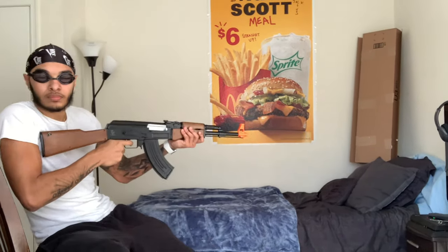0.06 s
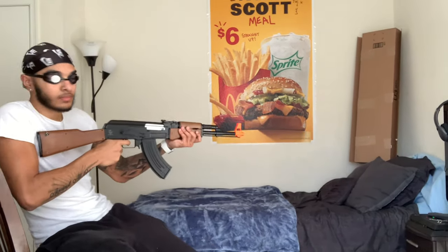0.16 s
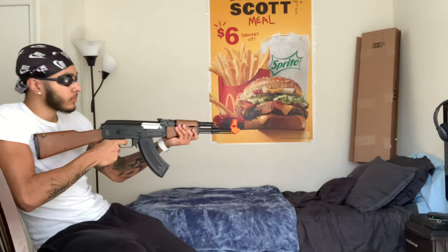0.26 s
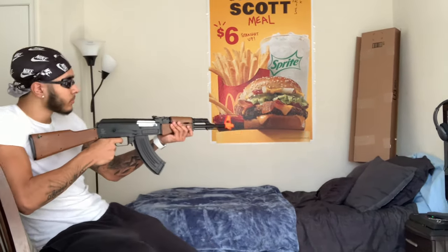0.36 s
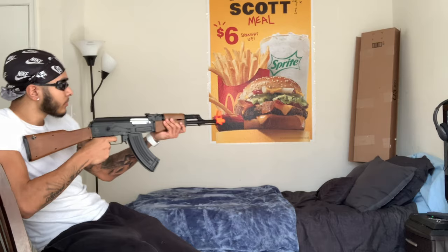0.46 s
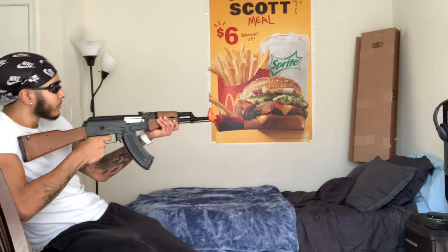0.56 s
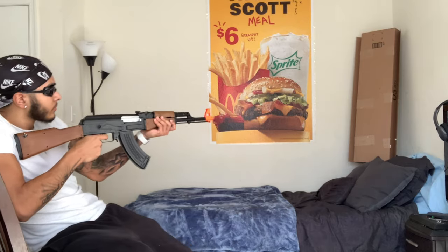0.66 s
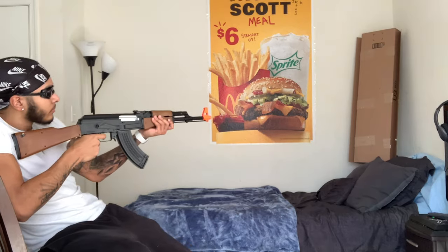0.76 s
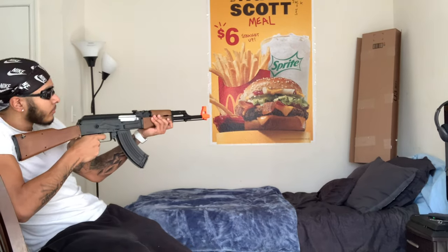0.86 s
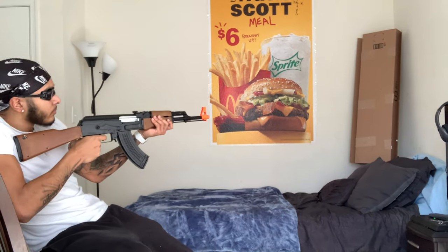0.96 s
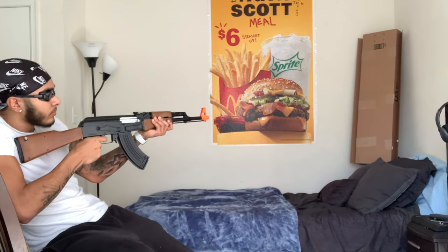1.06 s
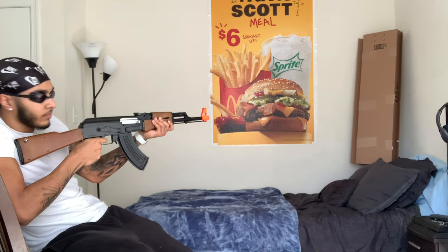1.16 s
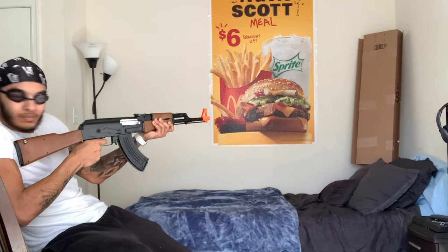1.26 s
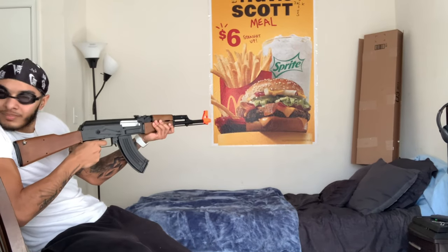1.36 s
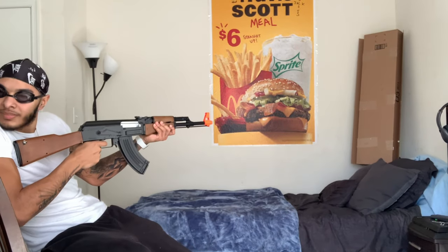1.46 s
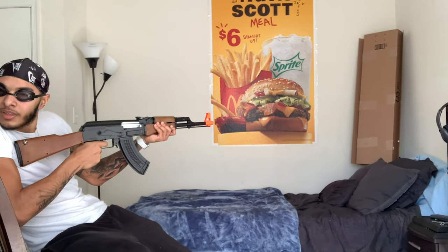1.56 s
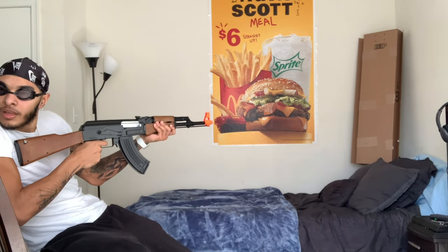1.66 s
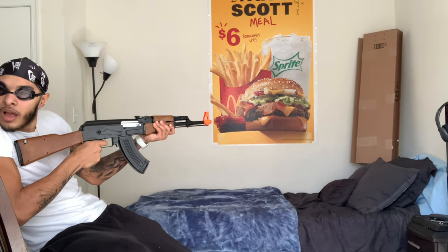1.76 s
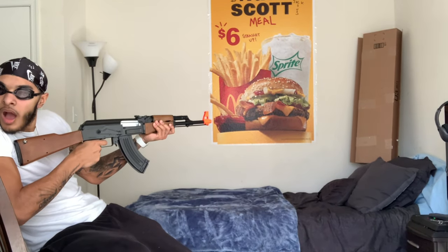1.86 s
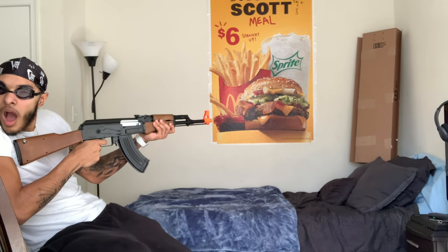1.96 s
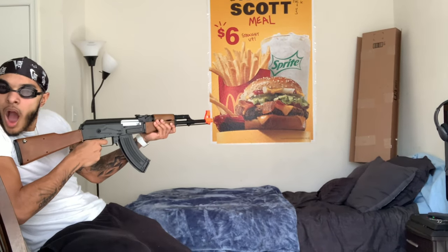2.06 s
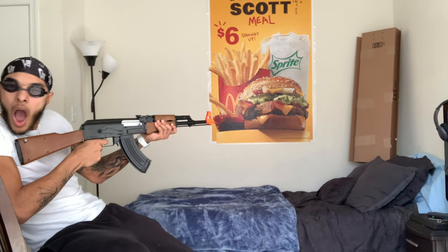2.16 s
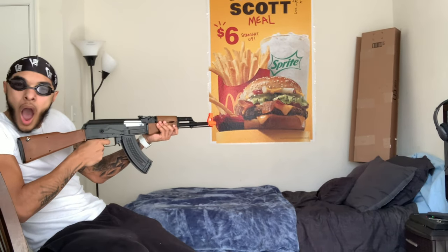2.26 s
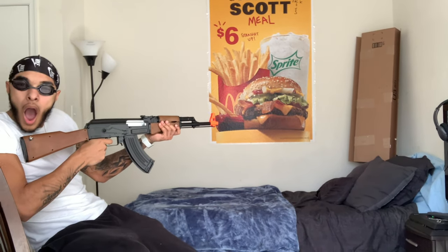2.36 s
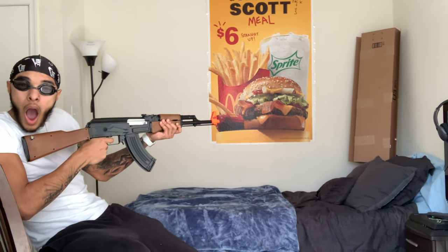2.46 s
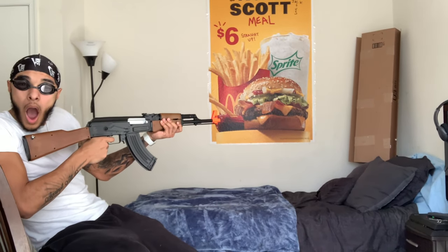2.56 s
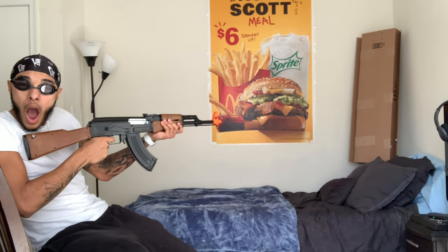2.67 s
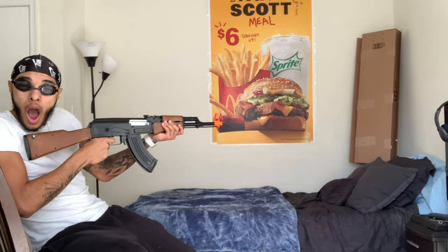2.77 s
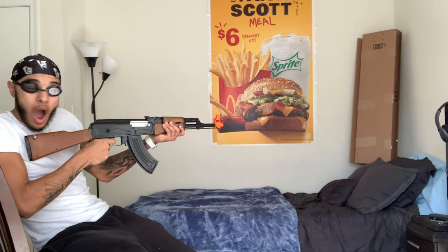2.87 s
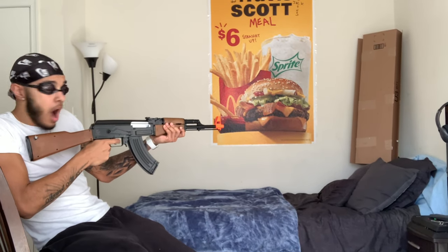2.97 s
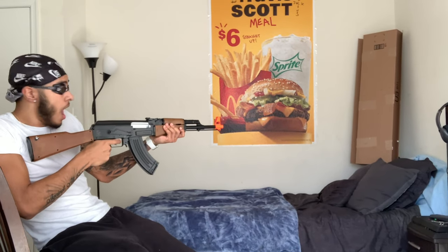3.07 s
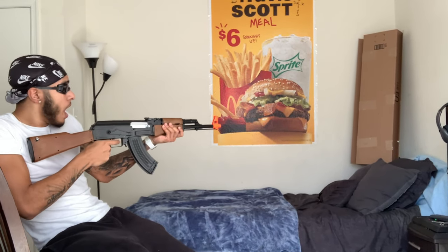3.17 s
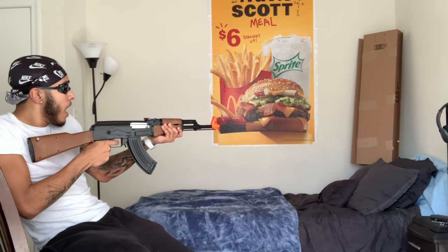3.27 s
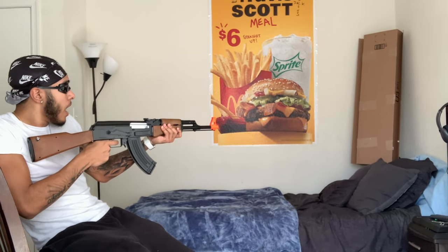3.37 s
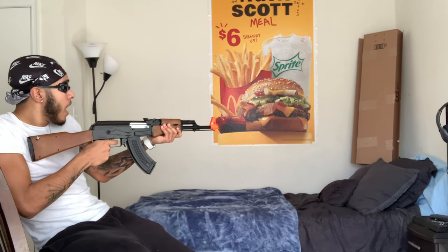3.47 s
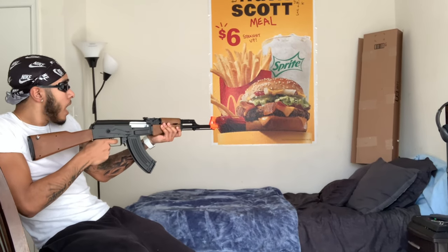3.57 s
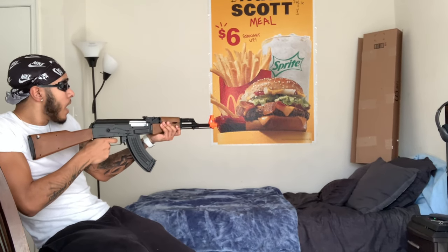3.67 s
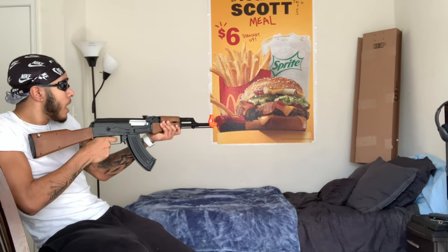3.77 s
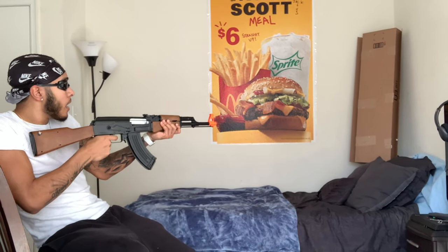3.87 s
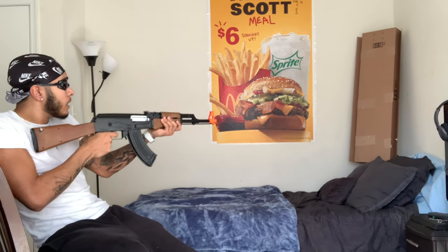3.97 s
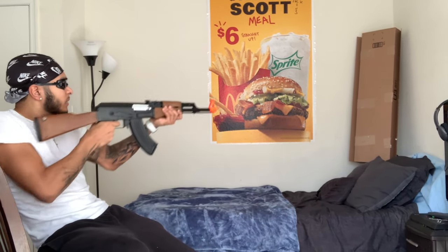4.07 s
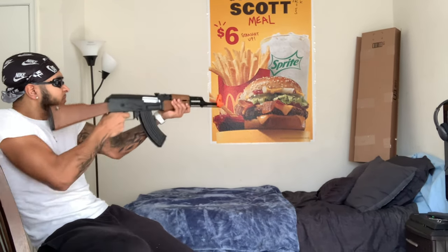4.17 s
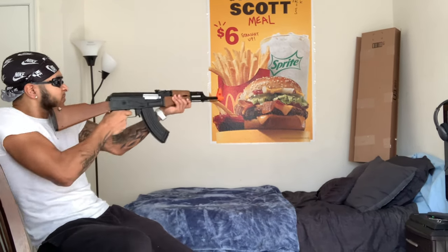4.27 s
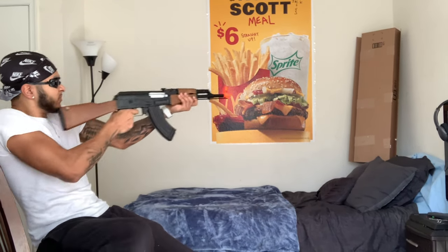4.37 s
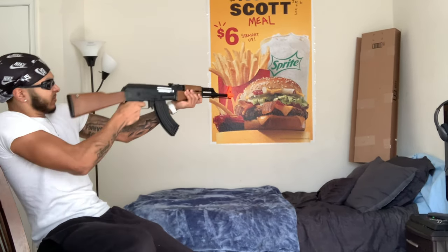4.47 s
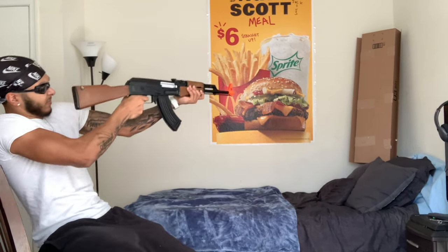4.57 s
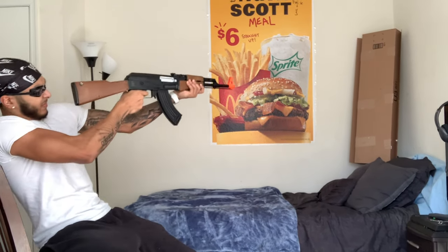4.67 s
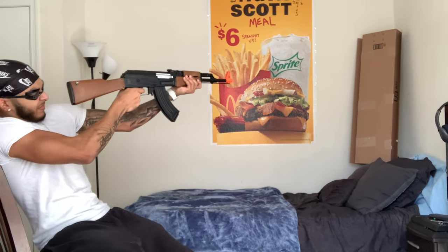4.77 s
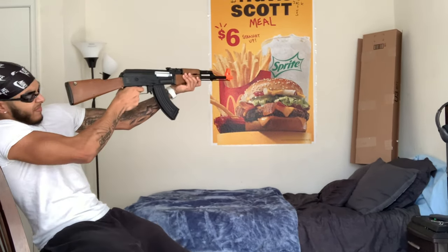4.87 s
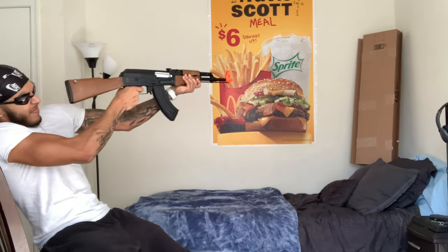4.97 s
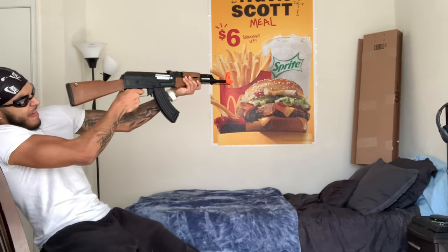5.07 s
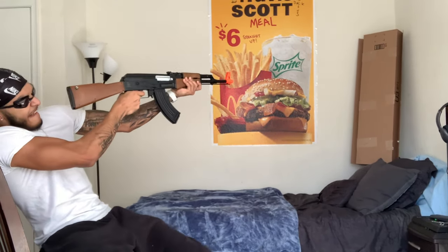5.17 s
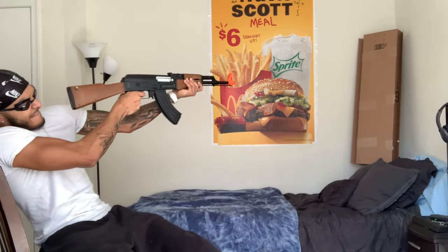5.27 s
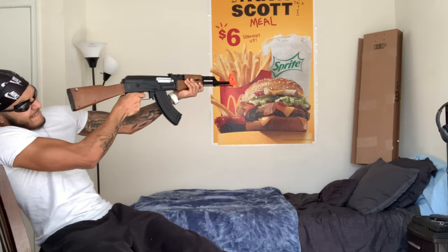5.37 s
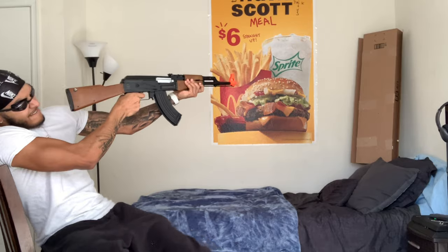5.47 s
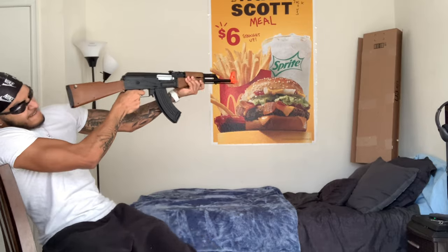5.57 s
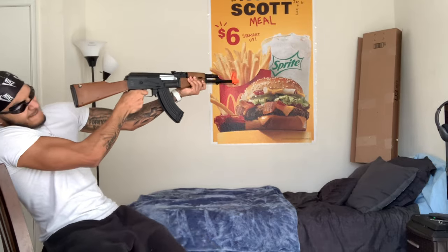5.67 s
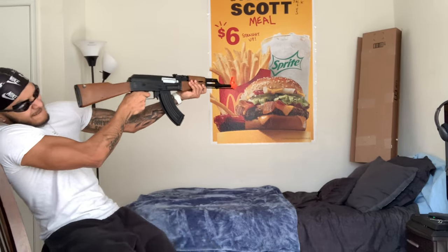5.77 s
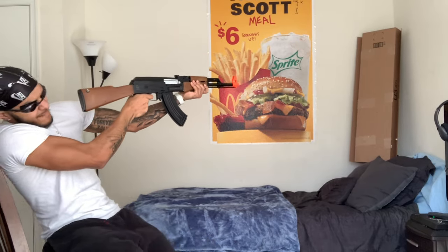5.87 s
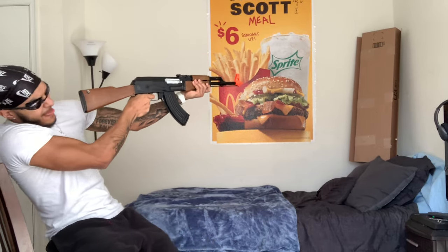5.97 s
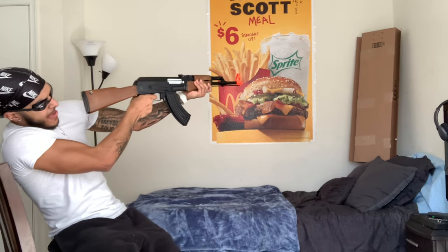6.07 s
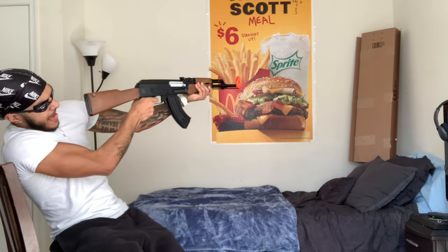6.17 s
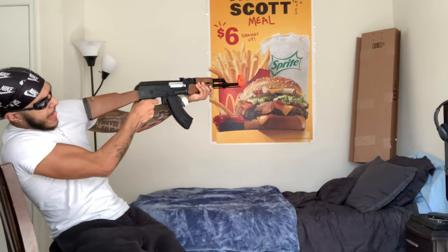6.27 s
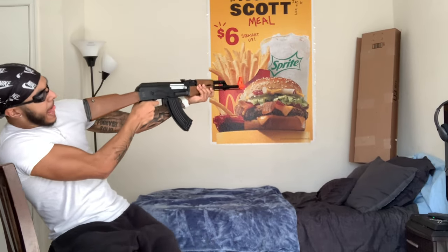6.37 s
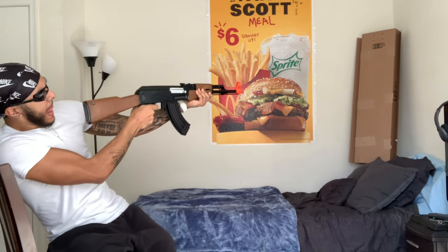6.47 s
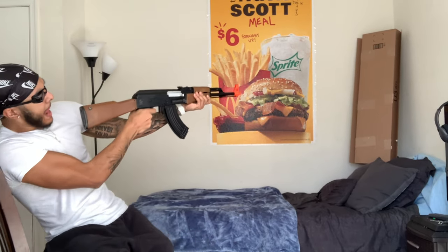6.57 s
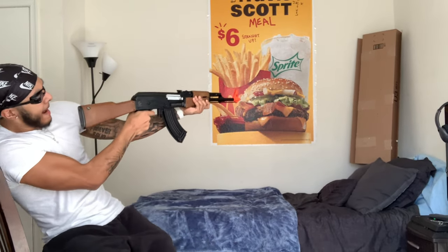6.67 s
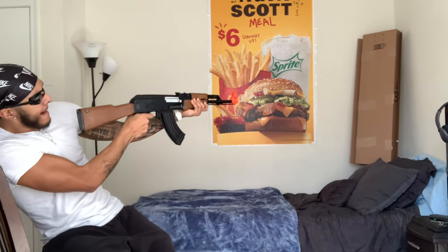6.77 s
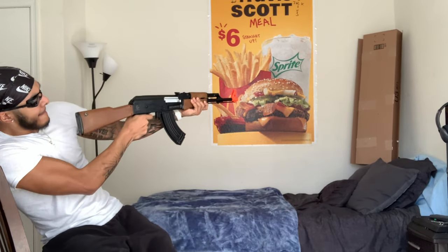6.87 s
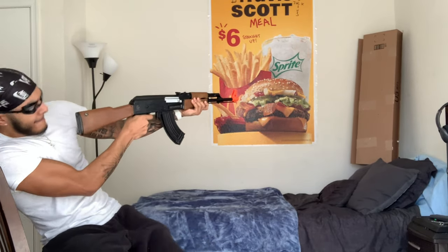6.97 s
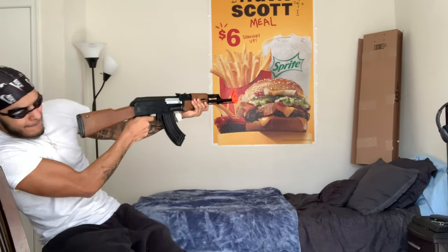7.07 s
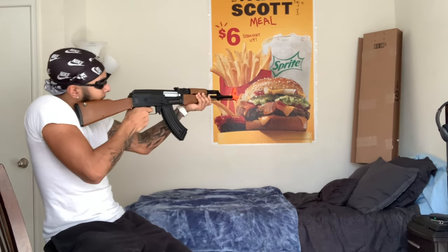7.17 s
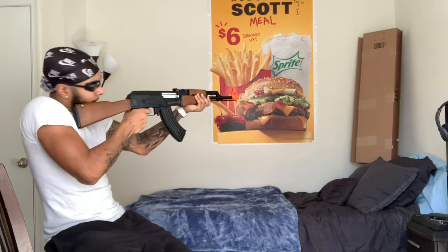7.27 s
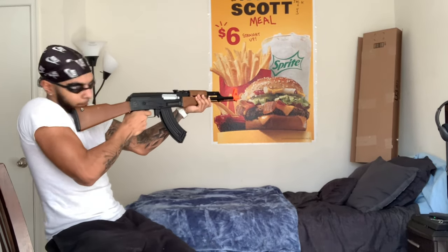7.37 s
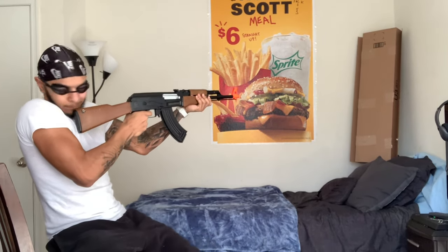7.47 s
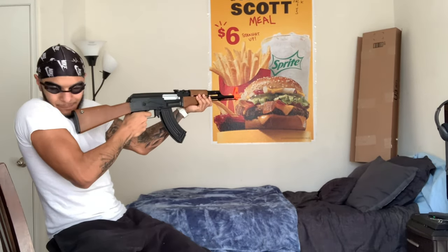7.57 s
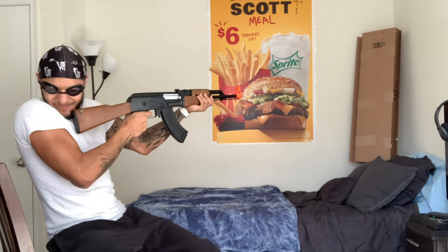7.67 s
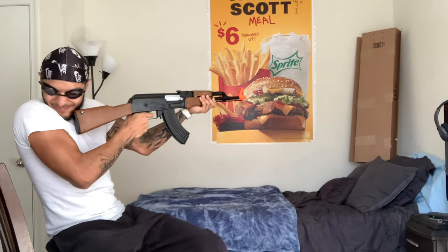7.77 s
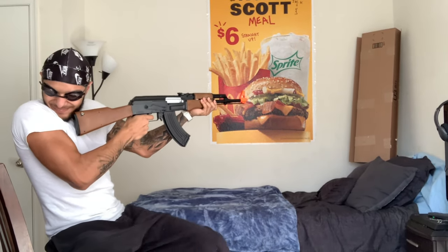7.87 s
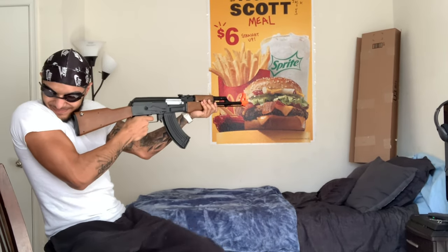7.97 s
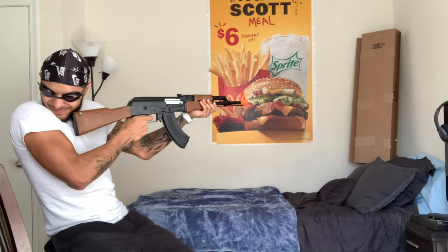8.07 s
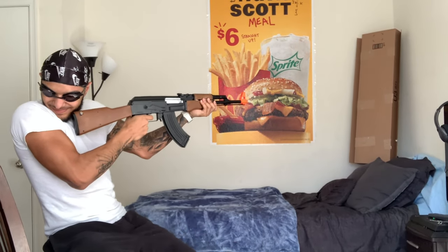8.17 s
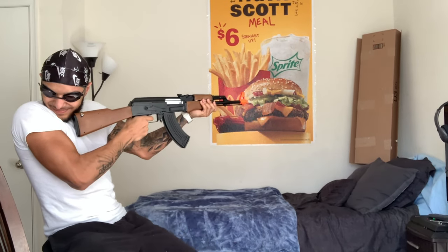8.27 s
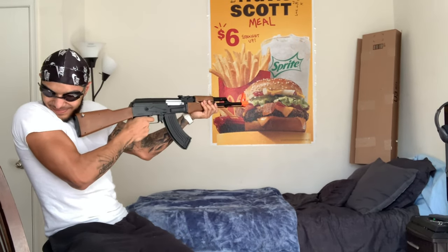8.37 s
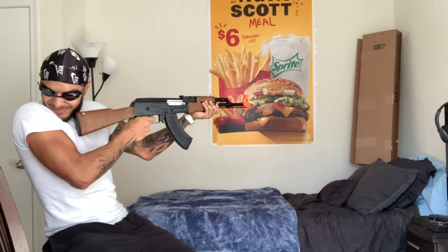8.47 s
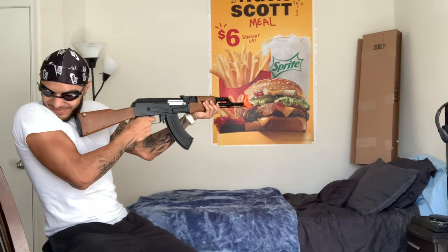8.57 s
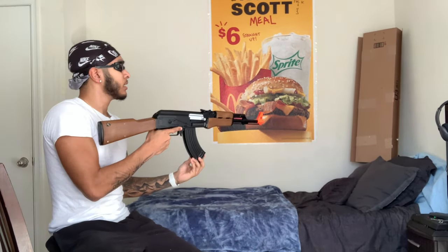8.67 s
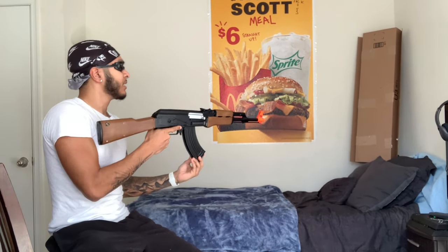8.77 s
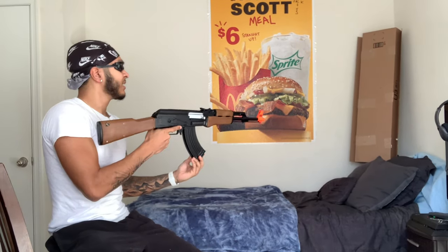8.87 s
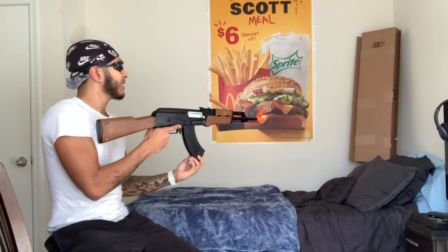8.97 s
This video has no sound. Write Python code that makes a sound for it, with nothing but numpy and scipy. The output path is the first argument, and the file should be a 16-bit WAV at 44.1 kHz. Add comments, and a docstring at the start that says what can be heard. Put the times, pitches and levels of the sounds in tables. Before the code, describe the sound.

In a small, lightly reverberant bedroom, faint cloth rustles precede an electric airsoft rifle's rapid burst: gear grind, plastic-metal clacks and pellets thumping a hollow cardboard box. The last shots run empty. After a pause of small clicks and knocks, a longer burst mixes box hits with louder, sharper empty snaps, then breaks off suddenly into faint room hum. A close phone microphone in stereo, slightly overloaded.

```python
"""An electric airsoft rifle fires two long automatic bursts, ten shots a second, in a small bedroom. Each cycle
is a nozzle tick, the impact of the piston (coloured noise and damped partials) and a muzzle pop. Gear teeth
grind and whine throughout; in the second burst the slams that hit no box snap harder. A fed pellet cushions the
slam and smacks a resonant cardboard box 35 to 40 ms later. Small clicks fill the pause, over a low hum, still
air and rustling cloth."""
import sys
import numpy as np
from scipy import signal
from scipy.fft import rfft, irfft, next_fast_len
from scipy.io import wavfile
from scipy.ndimage import uniform_filter1d, map_coordinates

SR = 44100
rng = np.random.default_rng(int(sys.argv[2]) if len(sys.argv) > 2 else 0)


def dump_mix(stems):
    """Bounce the given channels to the path in sys.argv[1] as a 16-bit WAV at rate SR."""
    frames = np.atleast_2d(stems).T  # one column per channel
    limited = np.clip(frames, -1, 1)  # hard clip at full scale
    pcm = np.round(limited * 32767).astype(np.int16)
    wavfile.write(sys.argv[1], SR, pcm)


N = 398223
NOW = np.arange(N) / SR  # time in the scene, s
AGE = np.arange(SR // 2) / SR  # time since a sound began, s

# Spectra hold relative density; the levels of single events are relative gains.
# trigger pulls: motor_start_s, full_speed_s, release_s, pellet_flight_s
BURSTS = [(0.893, 0.958, 2.941, .040), (3.972, 4.09, 8.7, .035)]
# slams not followed by a box hit: start_s, snap_db, low_note_hz, high_note_hz
UNANSWERED_SLAMS = [(2.266, -23.5, 1390, 3400), (2.3663, -25, 1390, 3320), (2.466, -25, 1200, 3160),
                    (2.565, -23.5, 1170, 3400), (2.6646, -19.5, 1150, 3440), (2.7627, -24, 1180, 3220),
                    (2.8635, -24.5, 1185, 3000), (4.2985, -11, 1354, 3030), (4.9986, -9, 1310, 2880),
                    (5.301, -10.5, 1250, 3460), (5.4022, -12, 1320, 2950), (5.6039, -11.5, 1340, 2880),
                    (5.8061, -10, 1240, 3300), (5.9068, -10, 1340, 2900), (6.009, -10.5, 1290, 3450),
                    (6.111, -10.5, 1780, 3100), (6.314, -10.5, 1280, 2860), (6.4159, -10.5, 2240, 3830),
                    (6.518, -10.5, 2200, 3450), (6.6205, -10.5, 1810, 3460), (6.7232, -10, 1800, 3410),
                    (6.8253, -10.5, 1780, 3430), (6.9282, -10.5, 2160, 2900), (7.03, -10.5, 2150, 2900),
                    (7.7087, -18, 1560, 3300), (7.8067, -6.5, 1310, 4000), (7.909, -18, 1180, 4000),
                    (8.0085, -7.5, 1330, 4230), (8.1108, -10, 1310, 4430), (8.2122, -11, 1330, 2850),
                    (8.3136, -9.5, 1530, 3290), (8.4156, -8.5, 1334, 3220), (8.5176, -9.5, 1310, 3460),
                    (8.6189, -7.5, 1330, 3210)]
# a slam cushioned by the air behind a pellet: snap_db, low_note_hz, high_note_hz
FED_SLAM = (-22.5, 2000, 5200)


def shots():
    """Causality of flight: a cushioned slam precedes each landing; the slams without a landing join them in
    time order."""
    fed = []
    for start, _, release, flight in BURSTS:
        for hit in HITS:
            if start < hit[0] < release:
                fed.append((hit[0] - flight, *FED_SLAM))
    return sorted(fed + [tuple(slam) for slam in UNANSWERED_SLAMS])


POP_HZ, POP_WIDTH_S, POP_DELAY_S = 440, .0013, .0092
RIFLE_LAG_S = -0.00056  # the rifle is held to the left


def pop():
    """Pressure pulse: one short swing of air at the muzzle reaches the two microphones in turn."""
    t = AGE[:SR // 20] - POP_DELAY_S - np.array([[.5], [-.5]]) * RIFLE_LAG_S
    return np.sin(2 * np.pi * POP_HZ * t) * np.exp(-(t / POP_WIDTH_S) ** 2)


# sharp contact of hard parts: frequency_hz, density_db
SNAP = [(200, -51), (1000, -14.5), (2000, -7.5), (4000, 1.5), (6000, -9), (9000, 9.5), (11000, 1.5),
        (13500, -17.5), (16000, -15)]
# bright edge of a slam: frequency_hz, density_db
SPIT = [(5000, -35.5), (8000, -11), (10500, -2.5), (13500, 4.5), (16000, -0.5)]
# rifle body: frequency_hz, density_db
BODY = [(60, -32.5), (100, -9.5), (150, 5.5), (200, -13), (300, 1), (700, 6), (1100, 0.5), (1600, -5),
        (2600, -5.5), (3500, -3), (6000, -3), (9500, 0), (13000, -4), (16000, -12.5)]
# resonances of the rifle's shell: centre_hz, width_hz, level_db
SHELL = [(204, 40, 6.5), (303, 32, 4.5), (384, 3.1, 1.5), (488, 12, 11.5), (709, 4.5, 7.5), (790, 9.9, -21),
         (1330, 30, 0.5), (1540, 130, -7), (1795, 410, 1.5), (2164, 11, 10.5), (2470, 40, 1.5),
         (2914, 270, -4), (3340, 170, -4.5), (4370, 110, -9.5)]
# the room's answer to the pop: frequency_hz, density_db
POP_ROOM = [(60, -31), (110, -8), (160, 4.5), (220, -0.5), (320, 2), (520, -4), (720, 2), (950, -12.5),
            (1500, -29)]
# partials of the gearbox shell: pitch_hz, level_db, t60_s
CLACK = [(1330, -5, 0.027), (1600, -1, 0.038), (1800, -4, .025), (2214, -2.5, 0.031), (2884, -3, 0.02),
         (3460, -5, 0.02), (4340, -6.5, .02)]
# metal that rings on: pitch_hz, level_db, t60_s
SPRING = [(1400, 0, .5), (1425, -2, .5), (1880, -8, .4)]
# near surfaces returning the bright edge: delay_s, level_db
ECHOES = [(.004, -8), (.0102, -10.5), (.035, -10)]
NOZZLE_LEAD_S = .0175  # the nozzle ticks this long before each slam
SHELL_THIN_HZ = 900  # the shell radiates little below this
CLACK_DB, POP_DB = -13.5, -13.5


def piston():
    """Impact excitation: nozzle and piston strike, shell and spring answer as resonators, the muzzle pops."""
    out = np.zeros((2, N))

    def shell_gain(hz):
        radiation = hz ** 2 / np.hypot(hz ** 2, SHELL_THIN_HZ ** 2)
        return resonant(SHELL, 1.3, hz) * radiation

    def shell_ring():
        body = noise(BODY, len(AGE), width_db=0.0, boost=shell_gain, lag=RIFLE_LAG_S)
        return blow(ring(body, life=0.42, build_cycles=4.0))

    def scattered_clack():
        return chime([(hz, db + rng.normal(0, 2), t60) for hz, db, t60 in CLACK])

    # patterns that successive slams pass through slowly
    shells = [shell_ring() for _ in range(16)]
    booms = [blow(ring(noise(POP_ROOM, len(AGE), width_db=-3), life=0.48, build_cycles=1.3)) for _ in range(24)]
    sizzles = [blow(ring(noise(SPIT, len(AGE)), life=0.82, build_cycles=1.5)) for _ in range(12)]
    snaps = [crack(SNAP, t60=0.012, rise=0.00067) for _ in range(20)]
    clacks = [scattered_clack() for _ in range(30)]
    spring, muzzle = chime(SPRING), pop()
    swell = 1 - np.exp(-AGE / 0.0012)  # the shell's notes take a moment to build

    for s, snap_db, low_hz, high_hz in shots():
        air_db = .3 * snap_db + rng.standard_normal()
        clack = amp(.8 * snap_db + CLACK_DB) * drifting(clacks, s)
        notes = swell * chime([(low_hz, 0, .05), (high_hz, -1, .04)])
        spit = amp(snap_db - 6.0) * crack(SPIT, t60=0.0099, rise=.0003)
        add(out, s, amp(snap_db + 7.0) * drifting(snaps, s))
        add(out, s, spit)
        for delay, db in ECHOES:
            add(out, s + delay, amp(db) * spit)
        add(out, s, swell * clack + amp(.6 * snap_db - 17) * notes)
        add(out, s, amp(0.55 * snap_db - 17.0) * drifting(shells, s))
        add(out, s, amp(snap_db - 20.0) * drifting(sizzles, s))
        add(out, s, amp(air_db + POP_DB) * muzzle)
        add(out, s + POP_DELAY_S, amp(air_db - 28.0) * drifting(booms, s))
        add(out, s, amp(0.5 * snap_db - 46.5) * spring)
        add(out, s - NOZZLE_LEAD_S, amp(0.64 * snap_db - 13.0) * crack(SNAP, t60=0.026))
        add(out, s - NOZZLE_LEAD_S, amp(-15.5) * clack)
    return out


# grinding gears: frequency_hz, density_db
GEARS = [(60, -33.5), (150, -9.5), (350, -6.5), (800, 2.5), (1800, -4), (2600, -3), (4000, -2),
         (6500, -4.5), (11000, -4.5), (16000, -8.5)]
# gear noise before load and run-down: time_s, level_db
GEAR_LEVEL = [(1.0, -29.5), (1.9, -30.5), (2.4, -31), (2.9, -30.5), (4.1, -29.5), (5.3, -31), (5.9, -31.5),
              (7.0, -31.5), (7.3, -27.5), (7.9, -28), (8.1, -29.5), (8.6, -31.5)]
COAST_S, CRAWL_DB, CRAWL_SPEED = .2, -35.5, .17  # run-down time; relative level and speed of barely turning gears
STRAIN_DB = 8.5  # most that acceleration adds to the pinion's whine


def gearbox():
    """Gear meshing: teeth grind and whine at a rate that sags as the spring is wound and recovers on release."""
    slams = np.array(shots())[:, 0]
    wound = np.interp(NOW, slams, np.arange(len(slams))) % 1
    load = uniform_filter1d(wound, SR // 100)
    drive = np.zeros(N)
    for start, full, release, _ in BURSTS:
        drive = drive + np.interp(NOW, [start, full, release, release + COAST_S], [0, 1, 1, 0])
    run_up = CRAWL_SPEED + (1 - CRAWL_SPEED) * np.sin(np.pi / 2 * drive) ** 2
    speed = run_up * (1 - 0.2 * load + 0.025 * wobble(400) + .03 * wobble(11))
    teeth = 2 * np.pi * np.cumsum(2150 * speed) / SR  # phase; 2150 teeth a second at unit speed

    unsteady_db = 1.1 * wobble(40)
    pinion_db = 2.0 * np.sin(teeth / 9)  # nine teeth to a turn of the pinion
    chatter = amp(1.2 * wobble(350) + unsteady_db + pinion_db)
    grind = unit(chatter * noise(GEARS, N, boost=lambda hz: resonant(SHELL, 1.0, hz)))

    # the pinion sings louder while it accelerates
    strain_db = np.clip(np.gradient(run_up) * SR, 0, STRAIN_DB)
    backlash = .8 * drive * wobble(700)
    mesh = amp(-12.5) * np.sin(teeth + backlash)
    octave = amp(-12.5) * np.sin(2 * teeth + backlash)
    whine = amp(strain_db) * (mesh + octave)
    gear_db = np.interp(NOW, *np.transpose(GEAR_LEVEL)) + CRAWL_DB * (1 - drive ** 1.3) + 0.5 * load
    return (drive > 0) * amp(gear_db) * (grind + drive * whine)


# pellets landing: start_s, boom_db, slap_db, crack_db, first_hz, first_db, second_hz, second_db,
# third_hz, fourth_hz
HITS = [(1.029, -16, -22.5, -18.5, 414, -26, 743, -33, 1506, 2590),
        (1.131, -18.5, -23, -19, 462, -26, 746, -29, 1520, 2396),
        (1.2279, -20, -22, -24.5, 407, -28.5, 694, -31.5, 1160, 2970),
        (1.3264, -20.6, -20.5, -22, 506, -27.5, 700, -36, 1055, 3456),
        (1.4231, -21, -18, -20, 508, -25.5, 893, -30.5, 1402, 2460),
        (1.519, -26, -21.5, -19, 423, -30.5, 824, -35.5, 1384, 2891),
        (1.618, -23, -20, -19.5, 499, -33.5, 888, -35, 1386, 2480),
        (1.715, -21, -19, -22, 505, -27.5, 896, -31.5, 1400, 2492),
        (1.8138, -22, -20, -23.5, 497, -25.5, 904, -29.5, 1290, 2910),
        (1.9114, -23.5, -21.5, -21, 511, -25.5, 890, -30.5, 1276, 2510),
        (2.01, -20.5, -27, -20, 423, -29, 713, -31, 1300, 1920),
        (2.1102, -24.5, -21, -22, 390, -38.5, 770, -33.5, 1523, 2020),
        (2.2077, -23.5, -21.5, -20, 406, -39.5, 714, -31, 1518, 2223),
        (4.1311, -16.5, -19, -19.5, 404, -29, 754, -28, 1055, 2490),
        (4.235, -18, -20.5, -18.5, 409, -26, 867, -29, 1400, 3391),
        (4.4337, -21, -22, -25, 401, -31.5, 874, -29.5, 1535, 2498),
        (4.533, -19.5, -22, -17.5, 419, -28, 718, -28, 1370, 1911),
        (4.633, -19.5, -22, -21.5, 410, -24.5, 797, -34, 1260, 2840),
        (4.7329, -20, -21.5, -22, 420, -27.5, 840, -39, 1480, 3009),
        (4.8343, -20, -22, -22.5, 411, -23, 775, -42, 1421, 3330),
        (4.9357, -19, -23.5, -19.5, 417, -24.5, 860, -35, 1230, 2961),
        (5.1358, -19, -21.5, -21.5, 418, -23, 730, -41, 1388, 3300),
        (5.2357, -17.5, -21.5, -20, 553, -38, 861, -32.5, 1330, 2940),
        (5.539, -27.5, -23, -22.5, 487, -37, 775, -45, 1330, 2449),
        (5.7414, -19.5, -24.5, -24, 430, -27, 802, -31, 1233, 2060),
        (6.248, -20.5, -21.5, -22, 504, -35, 671, -27.5, 1355, 1938),
        (7.137, -18, -22, -20.5, 411, -22.5, 713, -32, 1260, 2850),
        (7.242, -17, -21.7, -19.5, 463.5, -22.5, 732, -31, 1254, 2455),
        (7.3417, -18, -19, -21.5, 393, -35.5, 870, -27.5, 1510, 2510),
        (7.4432, -20, -20, -22, 508, -35.5, 995, -34, 1222, 2100),
        (7.5412, -15.5, -21.5, -21, 495, -27, 692, -28, 1223, 2498),
        (7.641, -25.5, -23, -19, 490, -38.5, 770, -40, 1240, 3480)]
# boom of the box: frequency_hz, density_db
CARDBOARD = [(50, -22.5), (120, -6.5), (250, -3), (350, -3.5), (420, 2), (600, -0.5), (800, -1.5),
             (1100, -8), (2000, -41)]
# the struck face: frequency_hz, density_db
SLAP = [(500, -35.5), (1100, -3.5), (1400, -0.5), (1800, 0), (2400, -2.5), (3200, -9), (6000, -33)]
# paper bursting: frequency_hz, density_db
TEAR = [(1200, -30.5), (2700, -3), (3700, -1), (5500, -10), (8000, -14.5), (10000, -28.5), (12000, -13),
        (16000, -12)]
# direct crack of a contact: frequency_hz, density_db
CRACK = [(300, -27), (900, 9.5), (2000, -20), (3600, 6.5), (6000, -5.5), (11000, 0.5), (16000, -13.5)]
# resonances of the box: centre_hz, width_hz, level_db
PANELS = [(214, 6.2, -17), (302.7, 24, 1.5), (400, 23, -10), (499, 6.1, -12), (528, 24, -9), (742, 19, 1),
          (773, 20, 3), (842, 11, 5), (980, 7.4, 7), (1392, 140, 3.5), (2440, 21, -6), (2915, 30, 3)]
BOX_LAG_S = 0.00044  # the box stands to the right: the left microphone hears it later


def target():
    """Modal response: pellets crack through cardboard and bounce; each spot's own notes boom into the room."""
    out = np.zeros((2, N))
    box = lambda hz: resonant(PANELS, 0.88, hz)
    swell = 1 - np.exp(-AGE / 0.0034)
    near = 1 + 0.4 * np.exp(-AGE / 0.071)  # the panels themselves, before the room takes over
    for (s, boom_db, slap_db, crack_db, first_hz, first_db, second_hz, second_db,
         third_hz, fourth_hz) in HITS:
        boom_source = noise(CARDBOARD, len(AGE), width_db=-4.5, boost=box, lag=BOX_LAG_S)
        boom = near * ring(boom_source, life=1.0, build_cycles=1.1)
        slap_source = noise(SLAP, len(AGE), width_db=-2.0, boost=box, lag=BOX_LAG_S)
        slap = near * ring(slap_source, life=0.87, build_cycles=3.5)
        tear = near * ring(noise(TEAR, len(AGE)), life=0.85, build_cycles=1.5)
        notes = swell * chime([(first_hz, first_db, .19), (second_hz, second_db, .16)])
        face = swell * chime([(third_hz, 0, .11), (fourth_hz, -2, .09)])
        add(out, s, amp(boom_db - 2.5) * blow(boom) + amp(10.5) * notes)
        add(out, s, amp(slap_db - 2.0) * blow(slap) + amp(slap_db - 8.5) * blow(face))
        add(out, s, amp(crack_db - 3.5) * blow(tear))
        add(out, s, amp(crack_db + 7.0) * crack(CRACK, t60=0.043))
        add(out, s, amp(crack_db + 9.5) * crack(SNAP, t60=0.013))
        # three bounces at random moments
        for after, size in rng.random((3, 2)):
            add(out, s + 0.032 * after, amp(crack_db + 2.5 - 12 * size) * crack(SNAP, t60=0.0077))
    return out


# sharp clicks of the mechanism: start_s, level_db
CLICKS = [(0.671, -44), (0.966, -12), (0.989, -5), (2.308, -14), (2.408, -15), (2.506, -10.5),
          (2.605, -9.5), (2.803, -16), (2.9028, -14.5), (3.02, -23), (3.044, -7), (3.6037, -14),
          (3.6198, -12), (3.6503, -18.5), (3.676, -24.5), (3.9754, -27.5), (4.074, -19), (4.098, -11.5),
          (7.103, -10), (8.96, -53)]
# small plastic parts: pitch_hz, level_db, t60_s
TICK = [(1913, -0.5, 0.04), (2490, -4.5, 0.043), (4060, -5, 0.033), (4850, -18, 0.019)]
# short metallic rasps: start_s, level_db, hold_s
RASPS = [(2.66, -31, 0.038), (2.748, -29.5, 0.03), (3.049, -27.5, 0.064)]
# rasping metal: frequency_hz, density_db
RASP = [(200, -24.5), (1500, -10), (3000, -8.5), (6000, -5.5), (8500, -12), (13000, -5.5), (16000, -11.5)]
# soft hollow knocks: start_s, level_db
KNOCKS = [(.573, -36.5), (3.519, -53.5), (3.616, -38.5), (3.77, -61), (3.882, -54.5)]
# a soft knock: frequency_hz, density_db
HOLLOW = [(120, -19.5), (300, -12.5), (530, -8.5), (750, -14), (1200, -24.5), (2500, -45), (6000, -85)]
# the note of a soft knock: centre_hz, width_hz, level_db
HOLLOW_NOTE = [(505, 41, -3.5)]
# a metal part catches: start_s, level_db
PINGS = [(3.045, -1), (7.97, 4)]
# its ping: pitch_hz, level_db, t60_s
LATCH = [(1336, -21.5, 0.048), (1434, -30, 0.034), (4680, -28.5, 0.025), (5590, -38, 0.071)]
# the rifle's shell clunks: start_s, level_db; the one at 0.991 s adds a low thump to the first slam
CLUNKS = [(0.5709, -52), (0.991, -20.5), (3.1738, -24.5)]
# loose metal shivering after a clunk: centre_hz, width_hz, level_db
RATTLE = [(1420, 210, 19), (1900, 150, -6), (3400, 220, -5)]
RASP_ATTACK_S, RASP_FALL_DB_PER_S = 0.03, 230
CLUNK_THIN_HZ, CLUNK_DULL_HZ = 300, 3730  # a clunk lies between these
RING_ON_S = 3.176  # just after the last clunk


def handling():
    """Contact and friction: parts click, knock, rasp, ping and clunk; after the first burst metal rings on."""
    rasp = np.zeros(N)
    for s, db, hold in RASPS:
        attack = np.clip((NOW - s) / RASP_ATTACK_S, 0, 1)
        rasp = rasp + attack * amp(db - RASP_FALL_DB_PER_S * np.maximum(NOW - s - hold, 0))
    out = rasp * unit(amp(1.4 * wobble(540)) * noise(RASP, N))

    for s, db in CLICKS:
        add(out, s, amp(db) * crack(SNAP, t60=0.013))
        add(out, s, amp(db - 20.0) * chime(TICK))
        add(out, s, amp(db - 17.0) * crack(CRACK, t60=0.063))
        add(out, s, amp(db - 20.5) * ring(noise(RASP, len(AGE)), life=0.57, build_cycles=1.3))

    for s, db in KNOCKS:
        knock = noise(HOLLOW, len(AGE), boost=lambda hz: resonant(HOLLOW_NOTE, 1.9, hz))
        add(out, s, amp(db) * ring(knock, life=0.65, build_cycles=2.0))
    for s, db in PINGS:
        add(out, s, amp(db) * chime(LATCH))

    def dull(hz):
        thinning = np.hypot(1, (CLUNK_THIN_HZ / (hz + 1)) ** 2)
        return resonant(SHELL, 1.4, hz) / np.hypot(1, hz / CLUNK_DULL_HZ) / thinning

    for s, db in CLUNKS:
        add(out, s, amp(db) * ring(noise(BODY, len(AGE), boost=dull), life=0.83, build_cycles=1.5))
    shiver = noise(GEARS, len(AGE), boost=lambda hz: resonant(RATTLE, 2.5, hz))
    add(out, RING_ON_S, amp(-39) * ring(shiver, life=1.0, build_cycles=2.5))
    add(out, RING_ON_S, amp(-42) * chime(SPRING))
    return out


# low appliance hum: pitch_hz, rms_level_db
HUM = [(58.6, -57.5), (111, -64.5)]
# still air: frequency_hz, density_db
AIR = [(20, -26.5), (45, -14), (65, -4.5), (85, -1), (120, -7.5), (160, -9.5), (300, -20.5), (1200, -36),
       (2000, -36.5), (7000, -53.5), (11000, -70), (16000, -84.5)]
# hands and clothes: centre_s, half_length_s, level_db
RUSTLES = [(.25, 0.022, -73), (0.317, 0.026, -59), (0.42, 0.16, -72.5), (0.664, 0.087, -62.5),
           (3.602, 0.0042, -47), (8.75, 0.059, -62.5), (9.03, 0.017, -60)]
# a hand sliding on the stock: centre_hz, width_hz, level_db
SCRAPE = [(1960, 130, -2), (3400, 300, -9)]
# cloth: frequency_hz, density_db
CLOTH = [(300, -2.0), (1200, -5), (2000, -3), (3000, -6), (6500, -10), (11000, -21), (16000, -30)]


def background():
    """Steady tones and broadband noise: appliance hum, still air and friction as the shooter moves."""
    hum = sum(amp(db) * np.sqrt(2) * np.sin(2 * np.pi * hz * NOW) for hz, db in HUM)
    cloth = noise(CLOTH, N, boost=lambda hz: resonant(SCRAPE, 2.2, hz))
    moves = sum(amp(db) * np.exp(-((NOW - s) / half) ** 2) for s, half, db in RUSTLES)
    return hum + amp(-61.5) * noise(AIR, N) + moves * unit(amp(1.2 * wobble(67)) * cloth)


def amp(db):
    """Logarithmic level: decibels to gain."""
    return 10 ** (np.asarray(db) / 20)


def unit(x):
    """Power normalisation: scale to rms 1."""
    return x / np.sqrt(np.mean(x ** 2) + 1e-20)


BLOW_S = .035


def blow(sound):
    """Onset normalisation: scale a struck sound to rms 1 over its first moments."""
    return sound / np.sqrt(np.mean(sound[:, :round(BLOW_S * SR)] ** 2))


def along(points, hz):
    """Logarithmic frequency scale: read (frequency_hz, value) points along it."""
    f, v = np.transpose(points)
    return np.interp(np.log(hz + 1), np.log(f + 1), v)


def resonant(modes, depth, hz):
    """Resonance: gain of narrow peaks over a broad response."""
    peaks = sum(amp(db) / (1 + (2 * (hz - centre) / width) ** 2) for centre, width, db in modes)
    return 1 + depth * peaks


# stereo width: frequency_hz, side_to_mid_db; near 9 kHz the sound lies almost wholly in the side
WIDTH = [(60, -6), (120, -14.5), (200, -8), (380, -1.5), (700, 3), (1300, -1), (2400, 0.5), (4400, -0.5),
         (7000, -1.5), (9000, 30.5), (11500, -8.5), (16000, -40)]


def noise(spectrum, size, width_db=0, boost=lambda hz: 1, lag=0):
    """Spectral shaping: stereo noise of rms 1 with the set stereo width; below the treble the left may lag."""
    m = next_fast_len(size)
    hz = np.fft.rfftfreq(m, 1 / SR)
    side_gain = amp(along(WIDTH, hz) + width_db * (hz < 6000))
    colour = amp(along(spectrum, hz)) * boost(hz) / np.hypot(1, side_gain)
    mid, side = rfft(rng.standard_normal((2, m))) * colour * [np.ones_like(hz), side_gain]
    delay = np.exp(-2j * np.pi * hz * lag * (hz < 6000))
    return unit(irfft(np.array([(mid + side) * delay, mid - side]), m)[:, :size])


# decay of the room, scaled by each sound's life: frequency_hz, t60_s
ROOM = [(100, 0.36), (400, 0.39), (1200, 0.53), (3000, 0.53), (7000, 0.45), (15000, 0.23)]


def ring(source, life, build_cycles):
    """Reverberant decay: noise dies away in the room; low notes need some cycles to build up."""
    hz, t, z = signal.stft(source, SR, nperseg=128)
    hz = np.maximum(hz, 150)[:, None]
    decay = amp(-60 * t / (life * along(ROOM, hz)))
    build = 1 - np.exp(-(t * hz / build_cycles) ** 2)
    return signal.istft(z * decay * build, SR, nperseg=128)[1][:, :len(AGE)]


def crack(spectrum, t60, rise=0.0011):
    """Impulsive radiation: the direct sound of a hard contact."""
    t = AGE[:SR // 20]
    return noise(spectrum, len(t)) * amp(-60 * t / t60) * (1 - np.exp(-t / rise))


def chime(modes):
    """Damped vibration: decaying partials, each reaching the two microphones in its own phase."""
    out = 0
    for hz, db, t60 in modes:
        phase = rng.uniform(0, np.pi, (2, 1))
        out = out + amp(db - 60 * AGE / t60) * np.sin(2 * np.pi * hz * AGE + phase)
    return out


def wobble(rate):
    """Random modulation: a smooth curve of rms 1 through rate knots a second."""
    knots = rng.standard_normal(int(N * rate / SR) + 4)
    return unit(map_coordinates(knots, [NOW * rate], order=2))


def drifting(patterns, s):
    """Equal-power crossfade: the pattern at time s changes slowly as the rifle is moved."""
    place = np.clip(s / NOW[-1], 0, 1 - 1e-9) * (len(patterns) - 1)
    k, turn = int(place), place % 1 * np.pi / 2
    return np.cos(turn) * patterns[k] + np.sin(turn) * patterns[k + 1]


def add(track, s, sound):
    """Superposition: mix a sound into the track at time s."""
    start = max(round(s * SR), 0)
    part = track[:, start:start + sound.shape[1]]
    part += sound[:, :part.shape[1]]


BREAK_S = 8.664  # rifle, target and handling drop abruptly here


def scene():
    """Superposition: rifle, target and handling drop 30 dB together at the break; the background goes on."""
    live = np.interp(NOW, [BREAK_S - .003, BREAK_S + 0.0067], [1, amp(-30.0)])
    return live * (piston() + gearbox() + target() + handling()) + background()


TOP_HZ = 15950  # band limit


def record(dry):
    """Saturation and band limiting: the phone rounds off high peaks and cuts steeply above its band."""
    held = dry / (1 + np.abs(dry / .95) ** 4) ** (1 / 4)
    m = next_fast_len(N + SR // 2)
    edge = 1 / np.hypot(1, (np.fft.rfftfreq(m, 1 / SR) / TOP_HZ) ** 90)
    return irfft(rfft(held, m) * edge, m)[:, :N]


dry = scene()
out = record(dry)
dump_mix(out)
```